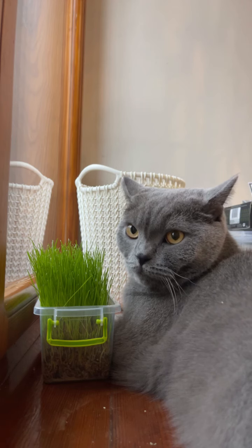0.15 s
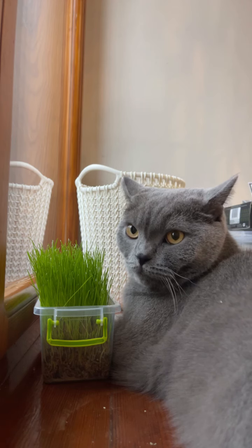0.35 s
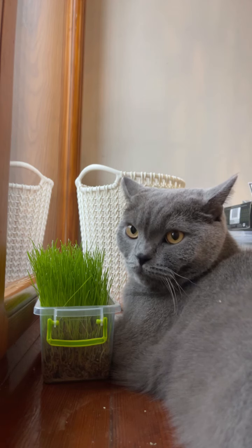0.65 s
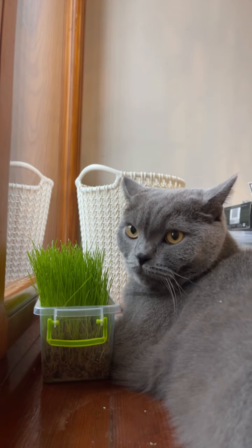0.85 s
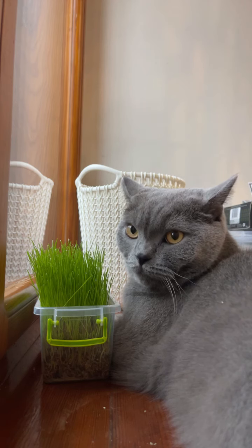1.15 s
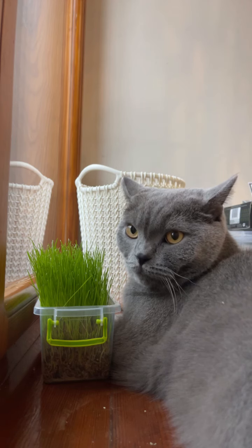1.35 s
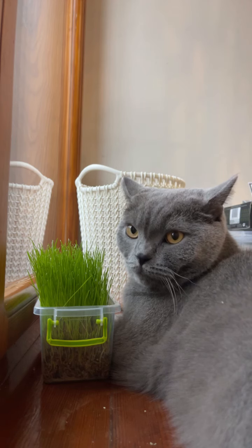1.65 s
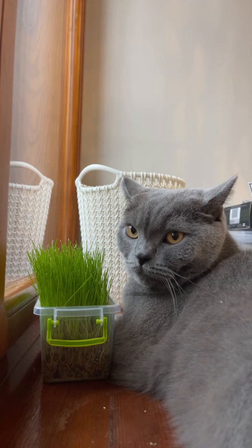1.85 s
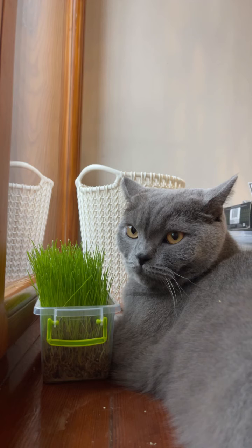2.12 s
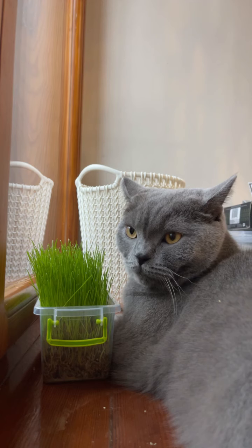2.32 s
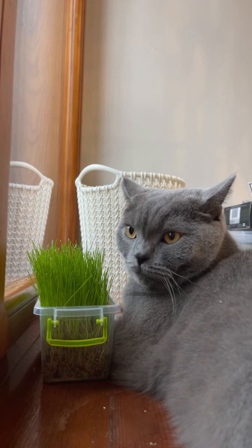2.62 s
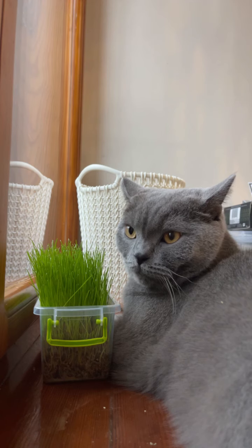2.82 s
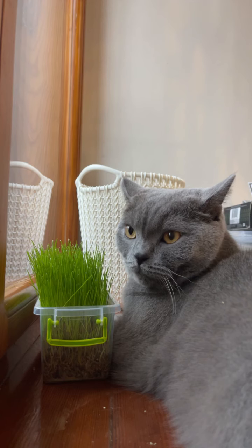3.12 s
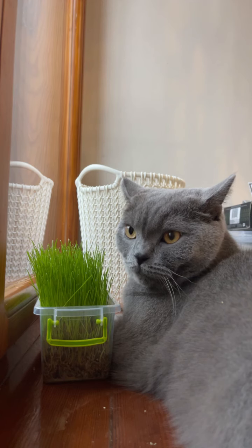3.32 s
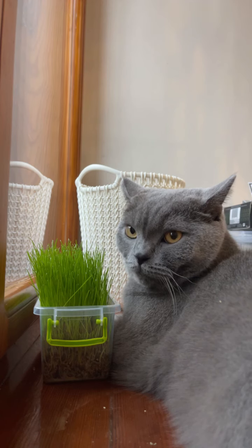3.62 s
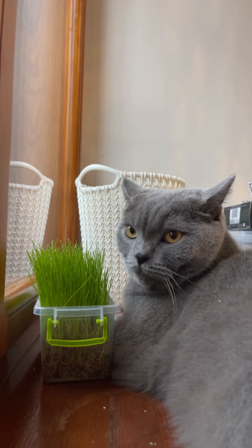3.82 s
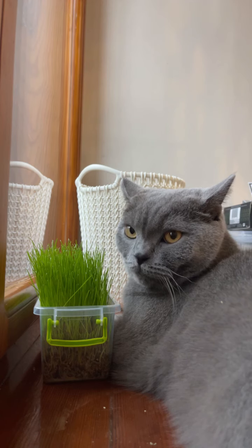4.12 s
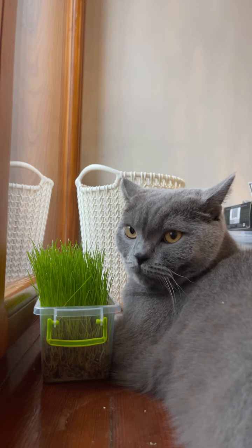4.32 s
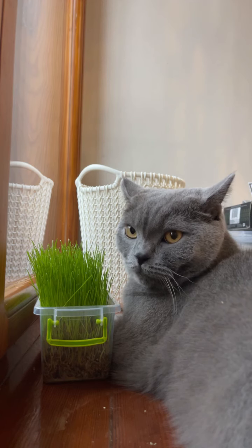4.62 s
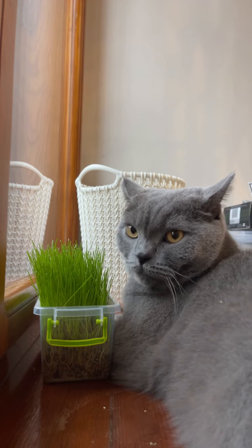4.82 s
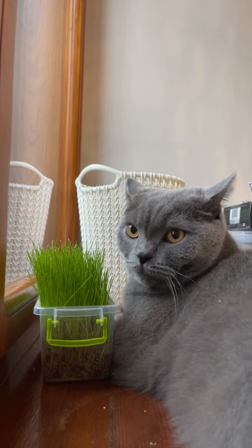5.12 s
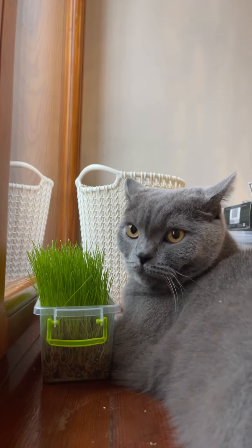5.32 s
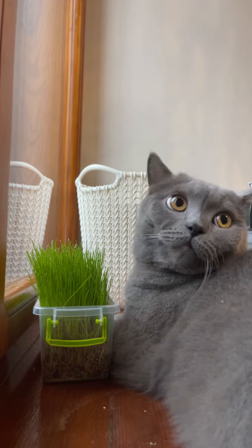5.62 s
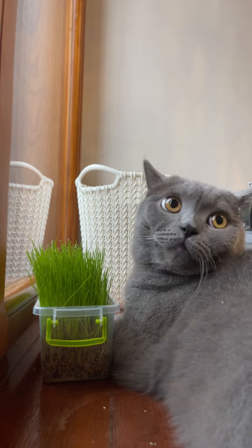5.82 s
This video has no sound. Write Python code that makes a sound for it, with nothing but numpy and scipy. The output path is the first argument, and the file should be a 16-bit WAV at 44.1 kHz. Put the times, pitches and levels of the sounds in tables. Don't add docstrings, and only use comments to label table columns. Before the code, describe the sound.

A steady appliance hum and faint hiss fill a quiet living room. Muffled steps and shuffles swell, then two knocks thump the floorboards with creaks and a tiny metal rattle. A low motor drone comes and goes while unseen things are scuffed and clacked together. Phone microphone, some distance away, with short indoor reverberation.

```python
import sys
import numpy as np
from scipy import signal
from scipy.fft import rfft, irfft
from scipy.io import wavfile
from scipy.ndimage import uniform_filter1d

SR = 44100
rng = np.random.default_rng(int(sys.argv[2]) if len(sys.argv) > 2 else 0)


def boost_factor(decibels):
    exponent = np.asarray(decibels, float) / 20
    return 10 ** exponent


def persist_wave(psi):
    counts = np.round(np.clip(psi, -1, 1) * 32767).astype(np.int16)
    wavfile.write(sys.argv[1], SR, np.atleast_2d(counts).T)


N = 262395

# [f/Hz, level/dB]
AIR = [(30, -56.5), (45, -20.5), (80, 2), (130, -6), (170, -5), (330, -19.5), (680, -21), (820, -33),
       (960, -38), (1130, -32), (1400, -33.5), (2600, -46.5), (5000, -52), (10000, -57), (12500, -63.5),
       (15800, -61.5)]
AIR_DB = -53
# [t/s, f/Hz, level/dB]
MAINS_HUM = [(0, 200, -47.8), (.5, 200, -47.5), (1.8, 200, -49.5), (2.2, 200, -48.3), (3.8, 200, -49),
             (4.15, 200, -47.8), (4.75, 200, -49.3), (5.3, 200, -48.2), (5.95, 200, -48.7)]
# [f/Hz, width/Hz, level/dB]
APPLIANCE_BANDS = [(301.7, 32, -62), (400, 14, -71.5), (481, 20, -76), (1710, 60, -85), (640.5, 70, -71.5),
                   (1250, 170, -74.5), (54, 4.8, -63)]
WHINE_HZ = 3332
# [t/s, level/dB]
WHINE_LEVEL = [(0, -92.5), (2.5, -93), (3.2, -96), (5.95, -95)]
# [f/Hz, level/dB]
APPLIANCE_OVERTONES = [(301.5, -66), (484.5, -75.5), (600.5, -77.5), (629.8, -78), (1303, -82)]
# [peak t/s, f/Hz, level/dB]
ROOM_BOOMS = [(.0, 81.2, -51), (.15, 73.6, -60), (.3, 84.7, -44), (.48, 84.5, -45.5), (.69, 83.3, -51),
              (.85, 85.8, -46.5), (1.01, 85.5, -52), (1.13, 76.8, -44), (1.27, 71.7, -37.5),
              (1.42, 70.4, -31), (1.5, 71.2, -32.5), (1.66, 73.6, -44.5), (1.92, 85, -46), (2.032, 76, -36),
              (2.04, 50, -44), (2.14, 78.2, -46), (2.4, 83.6, -52)]
BOOM_RISE_S, BOOM_T60 = 0.027, 0.3
# [start t/s, hold/s, f/Hz, level/dB]
MOTOR_DRONE = [
    (2.56, 0.21, 78.2, -50.5),
    (2.9, 1.05, 75.9, -50),
    (4.14, 0.16, 76.5, -52.5),
    (4.47, 0.14, 74.7, -50.5),
    (4.72, 0.035, 73.9, -45),
    (4.9, 0.19, 74.5, -50.5),
    (5.38, .05, 79, -55),
    (5.47, 0.034, 74.6, -57),
    (5.6, 0.045, 76.2, -51),
    (5.89, 0.015, 78.3, -52),
]
CATCH_S, LET_GO_T60 = 0.041, 0.34
# [f/Hz, t60/s]
ROOM_T60 = [(100, 0.89), (660, 0.42), (1740, 0.38), (4600, 0.33), (8000, 0.25), (12000, 0.2)]
# [f/Hz, level/dB]
FLOOR_DIP = [(740, -0.1), (930, -4.5), (1150, -0.1)]
# [f/Hz, level/dB]
MIC_COLOUR = [(30, 6.5), (7000, -3.5), (9800, 0), (11200, -12.5), (12400, -15.5), (14300, -10.5),
              (15700, -14)]
# [stop t/s, build-up/s, middle level/dB, bright
# level/dB, top level/dB]
SCUFF_STROKES = [(0, .01, -69, -67.5, -77), (.07, 0.16, -62.5, -85, -81), (.295, 0.045, -76, -88, -79),
                 (.5, .15, -75, -87, -88), (.2, 0.24, -65.5, -94, -84), (.868, 0.058, -66, -102, -81.5),
                 (1.14, .06, -67, -83, -95), (1.31, .04, -63, -90, -92), (1.99, .03, -66, -62, -68),
                 (2.085, .12, -61, -58, -66), (2.93, .06, -72, -66, -90), (2.495, .04, -65, -64, -90),
                 (1.063, 0.096, -56, -96, -95), (1.34, 0.67, -65.5, -103, -87),
                 (1.4, 0.019, -53, -55.5, -59), (1.448, 0.044, -51, -48, -59), (1.495, 0.17, -54, -58, -70),
                 (1.79, 0.18, -65, -74, -81), (2.03, 0.045, -47.5, -44.5, -62), (2.508, 0.15, -58, -64, -83),
                 (2.684, .05, -66, -74, -90), (2.96, 0.34, -63, -63.5, -80), (2.64, .12, -76, -88, -80),
                 (2.845, 0.055, -64.5, -67, -79), (2.79, 0.27, -69, -90, -81),
                 (3.282, 0.045, -56, -69, -97), (3.34, 0.12, -66, -63, -76), (3.392, 0.12, -54, -58.5, -71),
                (3.604, 0.23, -56.5, -61, -69.5), (3.914, 0.026, -61.5, -88, -90),
                (3.972, .15, -59.5, -76.5, -88), (4.046, 0.071, -60, -62, -82),
                (4.46, 0.091, -67, -73, -84.5), (4.89, 0.06, -61, -74, -88), (5.36, .04, -60, -75, -90),
                (5.07, .05, -64, -68, -67), (5.02, 0.12, -64.5, -67, -79.5), (5.221, 0.061, -66, -74, -82),
                (5.345, 0.03, -56.5, -59.5, -89), (5.42, 0.17, -59, -61, -80.5),
                (5.511, 0.092, -57.5, -53, -72), (5.687, 0.023, -67, -50.5, -73),
                (5.705, 0.032, -45.5, -73, -85), (3.78, 0.24, -83, -81, -81), (3.94, 0.091, -80, -90, -82),
                (4.28, 0.29, -77, -58.5, -77), (5.65, 0.15, -61.5, -68, -78.5)]
# [centre f/Hz, width/Hz]
STROKE_BANDS = [(2100, 2100), (4600, 4000), (9000, 4000)]
BUILD_DB, STROKE_TAIL = 26, 0.81
# [t/s, level/dB, f/Hz, width/Hz, t60/s]
HOLLOW_PARTS = [(.118, -53, 1400, 420, 0.17), (.118, -63, 2250, 200, 0.2), (0.272, -67, 2800, 600, 0.22),
                (5.475, -64.5, 7700, 550, 0.28), (1.358, -44, 730, 70, 0.13),
                (1.392, -46, 4470, 980, 0.078), (1.3, -55, 590, 300, 0.14), (1.42, -44, 2000, 450, 0.23),
                (2.012, -43, 412, 45, 0.18), (1.395, -37, 308, 30, 0.45), (1.43, -46, 455, 40, 0.2),
                (4.838, -54.5, 630, 80, 0.13), (0.272, -72, 3330, 120, 0.15), (1.045, -60, 1250, 200, 0.4),
                (3.272, -53.5, 377, 50, 0.21), (4.05, -59, 420, 80, 0.22), (4.15, -45.5, 10100, 900, 0.23),
                (4.581, -40.5, 2460, 500, 0.35), (4.581, -34, 4240, 650, 0.22),
                (4.583, -35.5, 5400, 550, 0.2), (5.055, -51.5, 435, 70, 0.2),
                (5.687, -44, 1160, 150.2, 0.1), (5.697, -49.5, 374, 36, 0.2), (5.712, -57, 1840, 700, 0.15),
                (4.072, -64, 7900, 1500, 0.51), (4.137, -61, 13100, 5000, .1),
                (2.024, -51.5, 1240, 70, 0.22), (5.472, -55.5, 5200, 500, .2)]
# [peak t/s, peak level/dB, f/Hz]
CONTACTS = [(.1263, -50, 1440), (.1641, -55, 1400), (.512, -64, 700), (1.1347, -45, 450),
            (1.2326, -42.5, 330), (1.2374, -46, 330), (1.3665, -38, 500), (1.3768, -34, 450),
            (1.3792, -44, 1600), (1.3838, -43, 1100), (1.3927, -52, 8000), (1.3993, -52, 8000),
            (1.4215, -35, 400), (1.4236, -43, 2000), (1.4283, -38, 450), (1.441, -33.5, 447),
            (1.4495, -37, 450), (1.4997, -51, 1500), (1.5049, -44, 450), (1.5167, -43, 450),
            (1.859, -63, 700), (2.0153, -37, 450), (2.0242, -42, 1300), (2.0244, -48, 8000),
            (2.0288, -49, 8000), (2.038, -44, 1500), (2.079, -50, 1500), (2.1352, -48, 450),
            (2.5164, -53, 1300), (3.3467, -47, 1190), (3.3578, -50, 600), (3.5427, -54, 3500),
            (3.582, -55, 1600), (4.0757, -53, 1300), (4.1428, -42, 9500), (4.144, -46, 1800),
            (4.1532, -38, 3000), (4.1544, -36, 1500), (4.1583, -34, 3120), (4.1604, -39, 10000),
            (4.169, -41, 2800), (4.1793, -46, 10000), (4.5771, -50, 9000), (4.5783, -48, 2000),
            (4.5828, -35, 5000), (4.5832, -42, 2000), (4.5884, -36, 8000), (4.5908, -30, 4300),
            (4.633, -37, 5000), (4.6882, -55, 1500), (4.8543, -48, 1500), (5.0582, -42, 1600),
            (5.059, -39, 3200), (5.0623, -39, 2100), (5.0663, -46, 450), (5.078, -47, 1500),
            (5.3639, -52, 1200), (5.6968, -46, 1200), (5.7016, -39, 1500), (5.7158, -43, 646)]
SNAP_CYCLES, SNAP_S = 0.45, 0.0003
# [start t/s, length/s, level/dB, f/Hz, width/Hz]
LOOSE_METAL = [(0.774, .12, -99, 10200, 400), (1.156, 0.056, -89, 6600, 253),
               (1.287, 0.033, -78, 5250, 150), (1.484, 0.08, -65.5, 5250, 260),
               (1.503, 0.061, -68, 5970, 380), (2.057, 0.057, -63.5, 5200, 280),
               (2.062, 0.062, -65, 5980, 380), (2.56, 0.031, -82, 5140, 150), (1.271, .03, -85, 5900, 350),
               (2.763, .05, -86, 5500, 350), (5.33, 0.017, -79, 6750, 250), (5.63, 0.056, -77, 6050, 250)]
# [peak t/s, f/Hz, level/dB]
BOARD_THUMPS = [(.92, 121, -54), (1.1, 116.2, -43.5), (1.245, 298, -53.5), (1.81, 300, -56.5),
                (1.87, 300, -64.5), (1.25, 101, -40.5), (1.38, 126, -36), (1.48, 127, -31.5),
                (1.71, 123.4, -46.5), (1.86, 123.7, -45.5), (1.99, 111, -44), (2.08, 119, -39),
                (2.17, 125.2, -39), (2.31, 125.6, -44.5), (2.41, 126.7, -44.5), (2.56, 130.6, -48),
                (2.68, 131.9, -48.5), (2.86, 124.7, -50.5)]
THUMP_RISE_S, THUMP_T60 = 0.024, 0.46
# [peak t/s, level/dB]
FURNITURE_CREAKS = [(.92, -52.5), (1.03, -51), (1.1, -57), (1.235, -50.5), (1.29, -50), (1.387, -39),
                    (1.435, -34), (1.5, -59), (1.72, -56), (1.86, -66), (2.017, -41), (2.12, -45.5),
                    (2.2, -53), (2.38, -75), (2.8, -59), (2.95, -52.5)]
CREAK_RISE_S, CREAK_T60 = 0.025, 0.42
# [f/Hz, level/dB]
CREAK_COLOUR = [(60, -38.5), (100, 6.5), (160, 1.5), (230, -3.0), (310, 2), (500, -10.5),
                (900, -20.0), (1500, -18.5), (4000, -73)]
# [low/dB, bright/dB, top/dB]
SURFACE_CLACKS = [(1.058, -63, 15, -5, -24), (1.3849, -49, 12, -3.5, -16), (1.726, -66, 0, 2, -8),
                  (2.017, -41.5, -4, -2.5, -22), (2.4188, -59.5, -31, -6, -7.5), (3.242, -61, -14, -2, -5),
                  (3.346, -47.5, 3, -14, -18.5), (3.5283, -52.5, -10, -10, -17), (4.077, -55.5, 3, -2, -10),
                  (4.1485, -43, -7.5, -4, 1.5), (4.158, -43, -6, -4.5, -8), (4.588, -47, -8, 6.5, 5),
                  (4.5816, -44, -10, 7, 3.5), (4.8542, -58, 3, -40, -40), (5.006, -61.5, -6, -20, -11),
                  (5.0451, -48, -12, -7, -8.5), (5.0597, -43, -8, -9.5, -28), (5.2919, -58, -14, -13, -44),
                  (5.479, -57, -1, -1, -24), (5.692, -61, 14, -12, -33)]
CONTACT_S = 0.019


def evened(x):
    return x / np.sqrt(np.mean(x ** 2) + 1e-20)


def read(points, hz):
    f, value = np.transpose(points)
    return np.interp(np.log(hz + 1), np.log(f + 1), value)


def follow(rows):
    s, *columns = np.transpose(rows)
    return [np.interp(np.arange(N) / SR, s, c) for c in columns]


def add(mix, s, sound):
    part = mix[max(round(s * SR), 0):][:len(sound)]
    part += sound[:len(part)]


def coloured(x, points):
    gain = boost_factor(read(points, np.fft.rfftfreq(len(x), 1 / SR)))
    return irfft(rfft(x) * gain, len(x))


def resonate(x, hz, width):
    r = np.exp(-np.pi * width / SR)
    pole = r * np.exp(2j * np.pi * hz / SR)
    once = signal.lfilter([1 - r], [1, -pole], x)
    return 2 * signal.lfilter([1 - r], [1, -pole], once).real


def ringing_noise(length, hz, width):
    return evened(resonate(rng.standard_normal(length), hz, width))


def patchy(shape, across, along):
    patches = uniform_filter1d(rng.standard_normal(shape), size=across, axis=0)
    return evened(uniform_filter1d(patches, size=along, axis=1))


def tone(turn, rough, width):
    shake = [ringing_noise(N, 0, width) for _ in range(2)]
    shaken = turn * (1 + rough * (shake[0] + 1j * shake[1]))
    return shaken.real / np.sqrt(.5 + rough ** 2)


def swell(s, hold, rise, t60):
    t = np.arange(N) / SR - s
    return np.exp(-(np.minimum(t, 0) / rise) ** 2) * boost_factor(-60 * np.maximum(t - hold, 0) / t60)


def rung(rows, rise, t60):
    t = np.arange(N) / SR
    return sum(boost_factor(db) * swell(s, hold, rise, t60) * np.exp(2j * np.pi * hz * t)
               for s, hold, hz, db in rows)


def without_hold(rows):
    return np.insert(rows, 1, 0, axis=1)


def air(patchy_db=1.17):
    hz = np.fft.rfftfreq(2048, 1 / SR)
    shape = (len(hz), N // 512 + 5)
    z = rng.standard_normal(shape) + 1j * rng.standard_normal(shape)
    z = z * boost_factor(read(AIR, hz)[:, None] + patchy_db * patchy(shape, 20, 8))
    return boost_factor(AIR_DB) * evened(signal.istft(z, nperseg=2048, noverlap=1536)[1][:N])


def appliances():
    hz, db = follow(MAINS_HUM)
    hum = boost_factor(db) * np.exp(2j * np.pi * np.cumsum(hz) / SR)
    bands = sum(boost_factor(db) * ringing_noise(N, hz, width) for hz, width, db in APPLIANCE_BANDS)
    whine = boost_factor(follow(WHINE_LEVEL)[0]) * ringing_noise(N, WHINE_HZ, 90)
    return tone(hum, rough=0.18, width=15.2) + bands + whine


def overtones():
    t = np.arange(N) / SR
    turn = sum(boost_factor(db) * np.exp(2j * np.pi * hz * t) for hz, db in APPLIANCE_OVERTONES)
    return tone(turn, rough=0.39, width=6.0)


def low_room_mode():
    booms = rung(without_hold(ROOM_BOOMS), BOOM_RISE_S, BOOM_T60)
    drone = rung(MOTOR_DRONE, CATCH_S, LET_GO_T60)
    return tone(drone + booms, rough=0.26, width=8)


def scuffs(grit_db=1.1, patchy_db=2.4, low_db=-8, top_db=-1):
    hz, t, z = signal.stft(rng.standard_normal(N + 512), SR, nperseg=512, noverlap=384)
    centres, widths = np.transpose(STROKE_BANDS)
    power, t60 = np.zeros(z.shape), STROKE_TAIL * read(ROOM_T60, hz)[:, None]
    for s, build, *levels in SCUFF_STROKES:
        mid, bright, top = levels - 10 * np.log10(widths / SR * 2)
        colour = [(300, mid - 40), (800, mid + low_db), *zip(centres, (mid, bright, top)),
                  (14500, top + top_db), (16000, top - 8.)]
        near = (t > s - 2 * build) & (t < s + .5)
        late = t[near] - s
        shape_db = BUILD_DB * np.minimum(late, 0) / build - 60 * np.maximum(late, 0) / t60
        power[:, near] += boost_factor(read(colour, hz)[:, None] + shape_db) ** 2
    z = z * np.sqrt(power) * boost_factor(patchy_db * patchy(z.shape, 8, 8))
    rubbing = signal.istft(z, SR, nperseg=512, noverlap=384)[1][:N]
    grit = boost_factor(grit_db * evened(uniform_filter1d(rng.standard_normal(N), size=200)))
    return grit * rubbing


def tick(s, db, hz, width, t60, clean=0.55):
    t = np.arange(16000) / SR
    struck = clean * np.exp(-width / 300) * 2 * np.sin(2 * np.pi * hz * t)
    ring = evened(ringing_noise(len(t), hz, width) + struck)
    return s, boost_factor(db - 60 * t / t60) * ring * (1 - np.exp(-t / 0.0056))


def snaps():
    mix, t = np.zeros(N), np.arange(1200) / SR
    for s, db, hz in CONTACTS:
        rise = SNAP_CYCLES / hz + SNAP_S
        pulse = t / rise * np.exp(1 - t / rise)
        add(mix, s - rise, boost_factor(db) * pulse * np.cos(2 * np.pi * (hz * t + rng.random())))
    return mix


def rattle(t60=0.18):
    mix, t = np.zeros(N), np.arange(12000) / SR
    for s, length, db, hz, width in LOOSE_METAL:
        ring = ringing_noise(len(t), hz, width)
        fading = boost_factor(db - 60 * np.maximum(t - length, 0) / t60)
        add(mix, s, fading * np.minimum(t / 0.005, 1) * ring)
    return mix


def boards():
    thump = tone(rung(without_hold(BOARD_THUMPS), THUMP_RISE_S, THUMP_T60), rough=0.5, width=35.0)
    creak = evened(coloured(rng.standard_normal(N), CREAK_COLOUR))
    load = np.sqrt(sum((boost_factor(db) * swell(s, 0, CREAK_RISE_S, CREAK_T60)) ** 2
                       for s, db in FURNITURE_CREAKS))
    return thump + load * creak


def clack(s, db, low_db, bright_db, top_db, lead=.006, build=0.0012, lumpy_db=2.0):
    hz, t, z = signal.stft(rng.standard_normal(24000), SR, nperseg=256)
    colour = [(60, low_db - 31), (300, low_db + 7.0), (800, low_db), (1300, 0), (3000, 0.003),
              (4500, bright_db), (6500, bright_db), (9500, top_db - 2.5), (11000, top_db + 4.5),
              (12200, top_db - 7.0), (16000, top_db - 2.5)]
    fading_db = -60 * np.maximum(t - CONTACT_S, 0) / read(ROOM_T60, hz)[:, None]
    lumps_db = lumpy_db * patchy(z.shape, 3, 10)
    z = z * boost_factor(read(colour, hz)[:, None] + fading_db + lumps_db)
    tail = signal.istft(z, SR, nperseg=256)[1]
    return s - lead, boost_factor(db + 3.0) * tail * (1 - np.exp(-np.arange(len(tail)) / SR / build))


def handling():
    mix = scuffs()
    for row in HOLLOW_PARTS:
        add(mix, *tick(*row))
    for row in SURFACE_CLACKS:
        add(mix, *clack(*row))
    return coloured(coloured(mix, FLOOR_DIP), MIC_COLOUR)


def scene():
    steady = air() + appliances() + overtones()
    moved = low_room_mode() + handling() + snaps() + rattle() + boards()
    return (steady + moved)[None]


def trimmed(x, audible_db=-120.6, rise_db=7.):
    hz, t, z = signal.stft(x, SR, nperseg=1024, noverlap=512)
    power = uniform_filter1d(uniform_filter1d(abs(z) ** 2, size=12, axis=0), size=2, axis=1)
    level_db = 10 * np.log10(power + 1e-30)
    over_db = level_db - audible_db - rise_db * (hz[:, None] - 13000) / 3000
    kept = np.maximum.accumulate(np.clip(over_db + .5, 0, 1)[::-1], axis=0)[::-1]
    z = z * np.where(hz[:, None] < 12500, 1, kept)
    return signal.istft(z, SR, nperseg=1024, noverlap=512)[1][:N]


def top_cut(x):
    return signal.sosfilt(signal.butter(12, 15980, fs=SR, output="sos"), x)


def record(dry):
    low_cut = signal.butter(4, 40., "high", fs=SR, output="sos")
    cut = signal.sosfilt(low_cut, dry[0])
    band_limit = signal.firwin(511, 15900, window=("kaiser", 9), fs=SR)
    limited = signal.oaconvolve(trimmed(cut), band_limit, "same")
    return top_cut(limited[None])


dry = scene()
out = record(dry)
persist_wave(out)
```